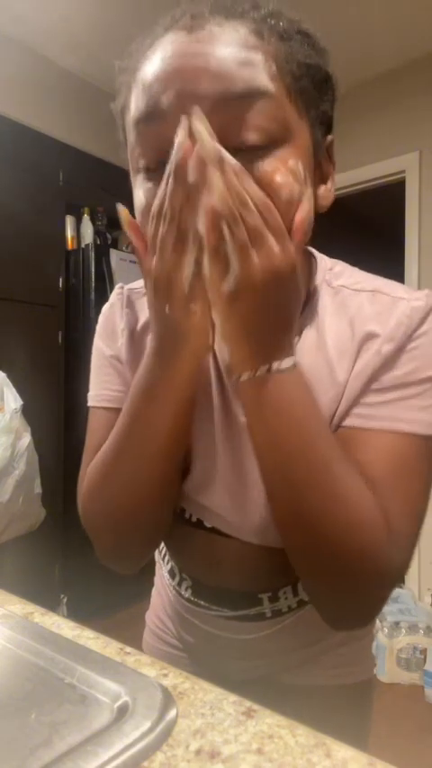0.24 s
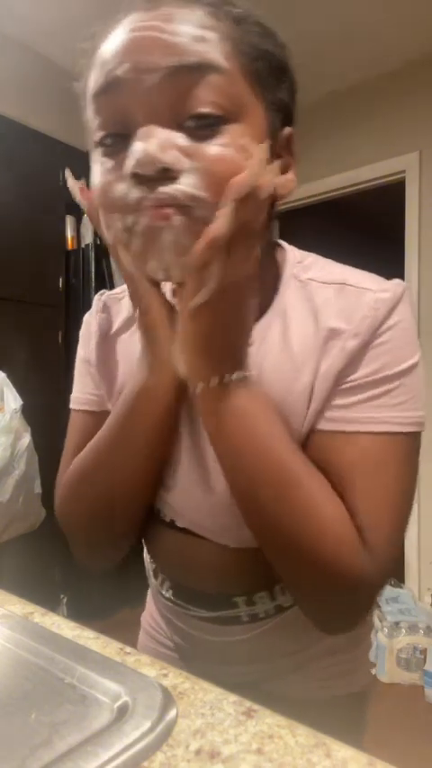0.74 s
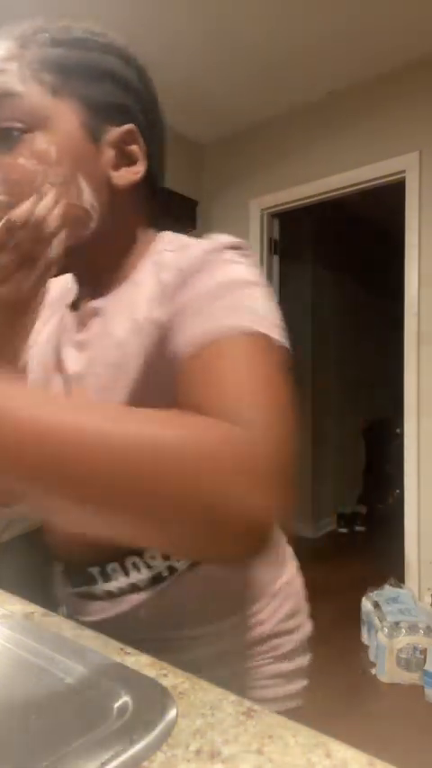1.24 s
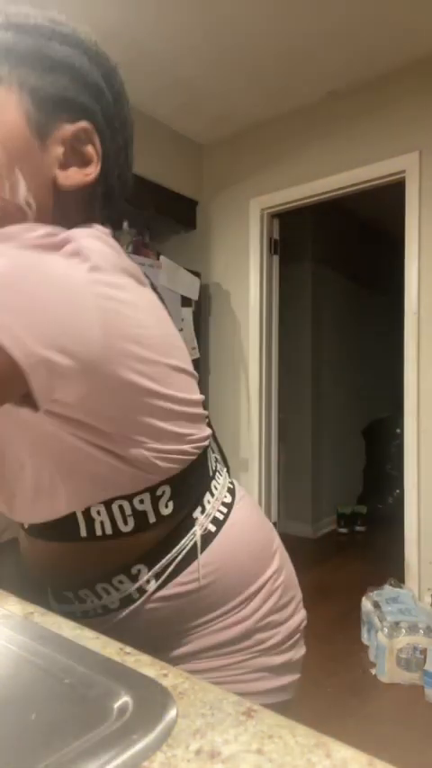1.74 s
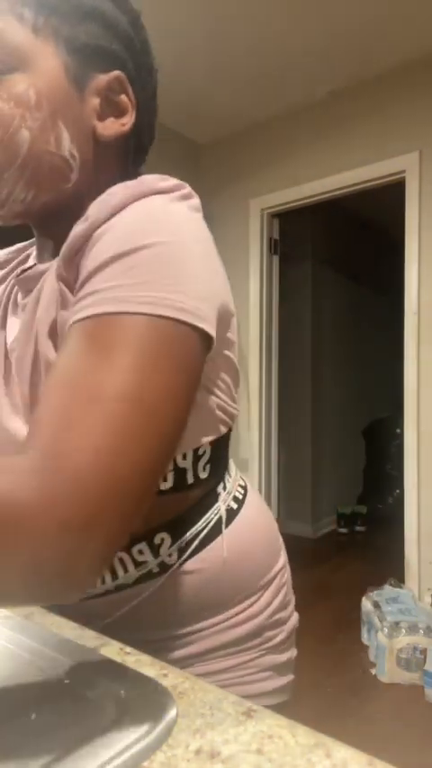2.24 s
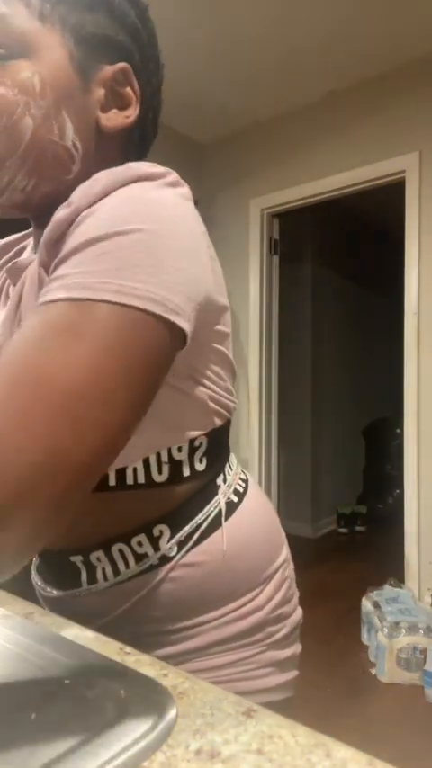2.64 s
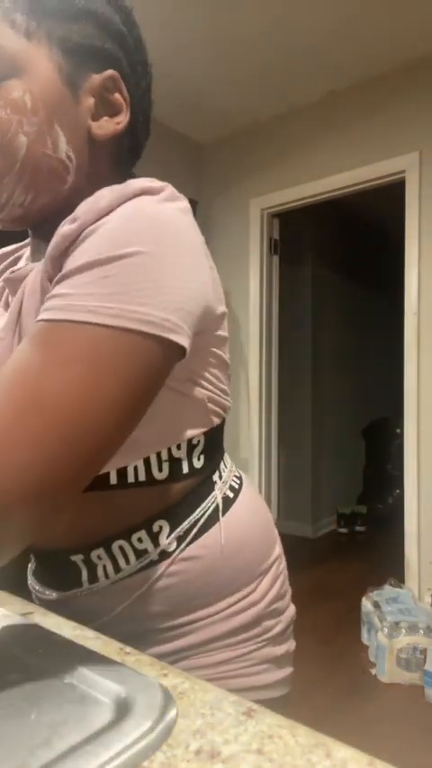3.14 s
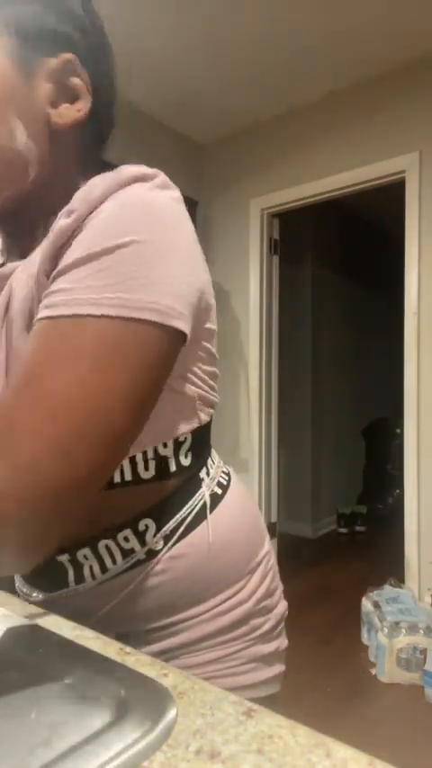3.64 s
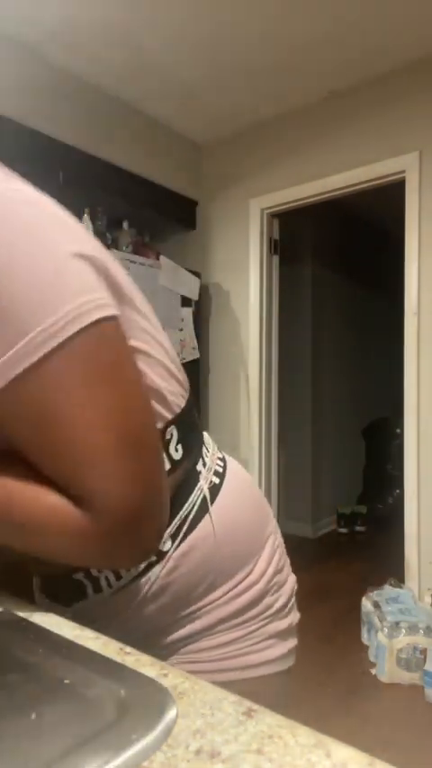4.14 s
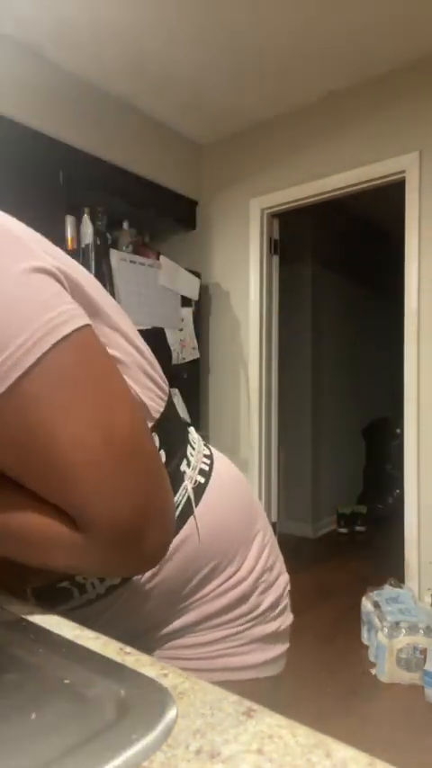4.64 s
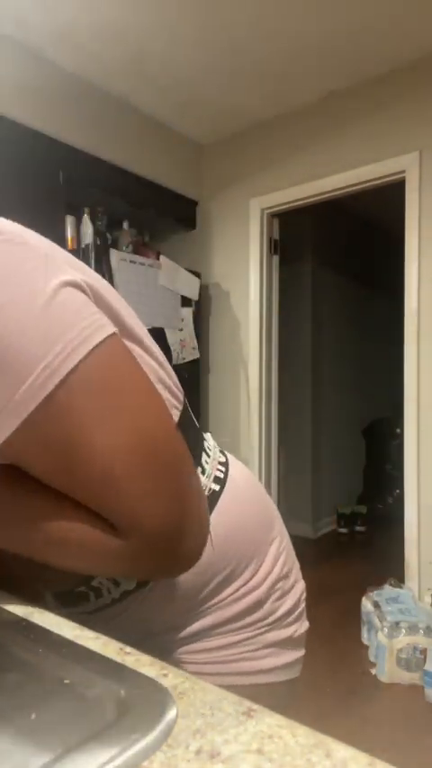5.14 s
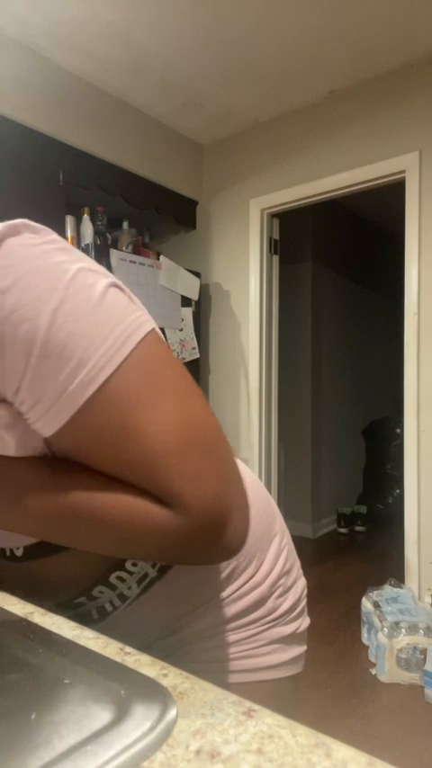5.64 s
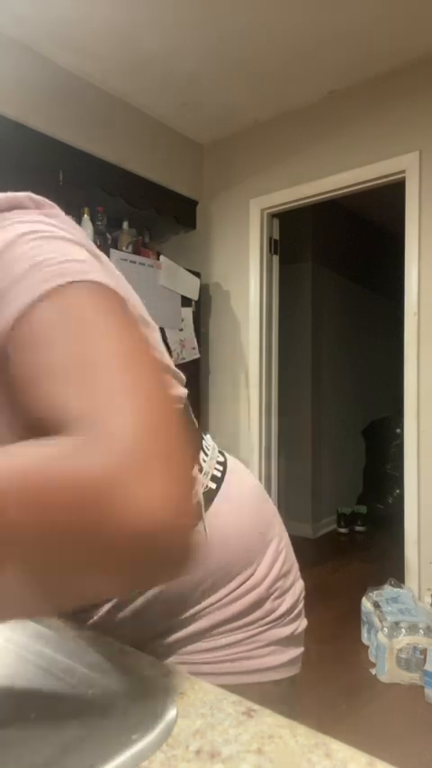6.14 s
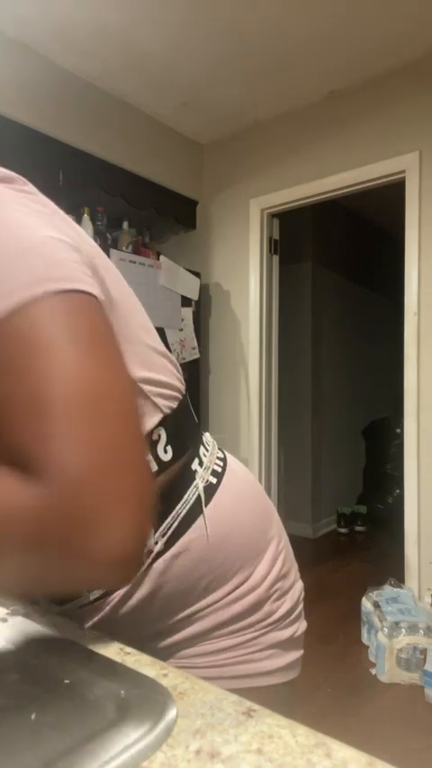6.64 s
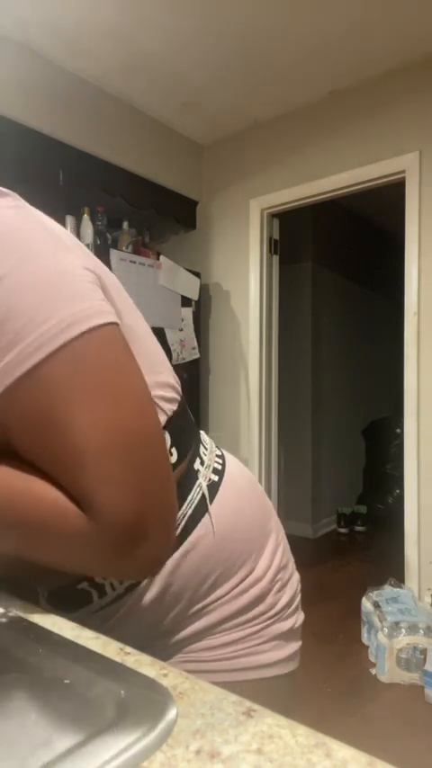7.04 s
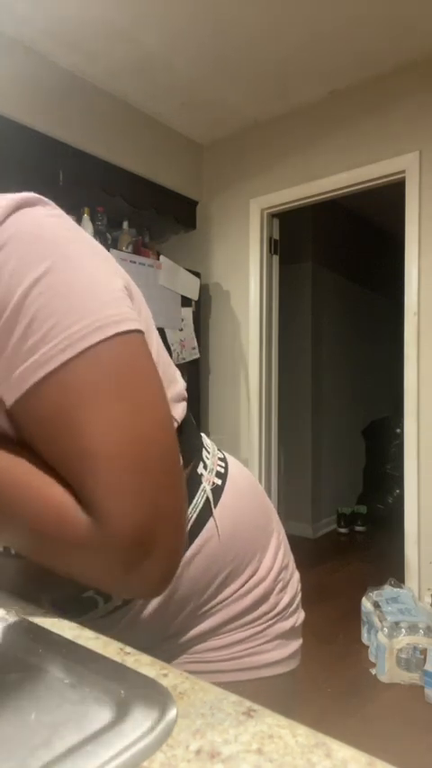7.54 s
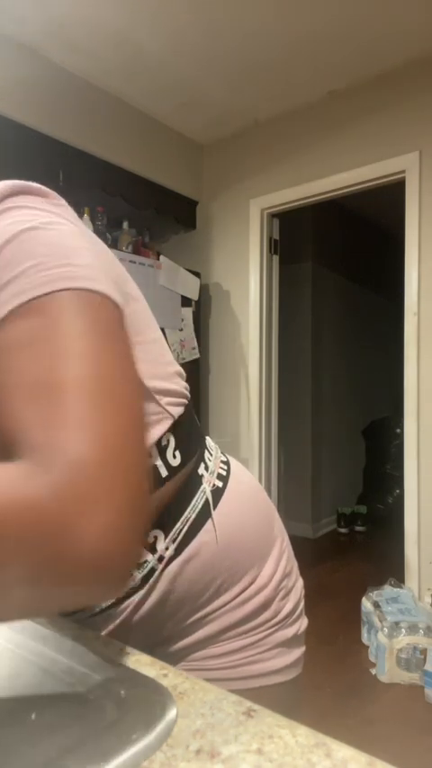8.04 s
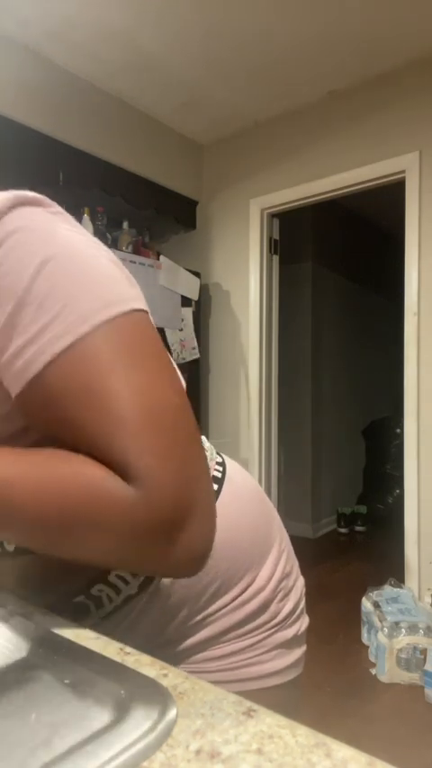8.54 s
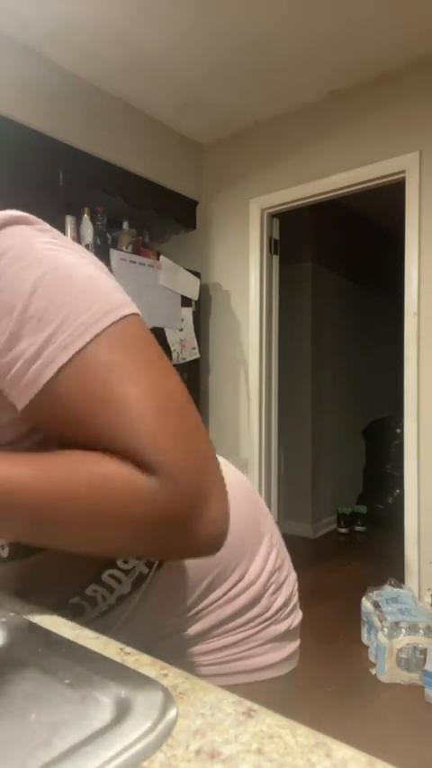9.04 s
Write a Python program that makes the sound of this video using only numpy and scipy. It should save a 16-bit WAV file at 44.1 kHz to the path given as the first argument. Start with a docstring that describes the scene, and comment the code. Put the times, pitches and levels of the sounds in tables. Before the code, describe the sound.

In a humming kitchen, counter bumps and tap knocks lead into water drumming steadily in a steel sink, with heavy splashes of dropped handfuls.

```python
"""A kitchen with a steel sink: the tap is opened and runs while someone rinses with cupped hands.
The stream is random drops that drum on the bowl's resonances, with fizzing shaped noise on top.
Dropped handfuls boom as clumps of drops, strike as short blows and spatter as bursts of noise.
Bubbles and drips are short tones, and walls echo the water as a tail of random taps.
Bumps are dying swings of the counter that the microphone stands on; steady fridge tones hum over dull noise."""
import sys
import numpy as np
from scipy import signal
from scipy.fft import rfft, irfft
from scipy.io import wavfile
from scipy.ndimage import uniform_filter1d

SR = 44100
rng = np.random.default_rng(int(sys.argv[2]) if len(sys.argv) > 2 else 0)


def gain_from_db(level_db):
    """Turn a decibel level (scalar or array-like) into a linear amplitude factor."""
    decades = np.asarray(level_db, float) / 20
    return 10 ** decades


def file_out(sig):
    """Save sig as 16-bit WAV at sys.argv[1]."""
    # one column per channel
    cols = np.atleast_2d(sig).T
    # limit, then scale
    lim = np.clip(cols, -1, 1)
    pcm = np.round(lim * 32767).astype(np.int16)
    wavfile.write(sys.argv[1], SR, pcm)


N = 409640  # length in samples

# Resonances of the bowl. Each row: pitch in Hz, width in Hz, relative level in dB under the stream,
# relative level in dB under a dropped handful.
BOWL_MODES = [(109.7, 6.7, -1.5, -4), (159, 50, -6.5, -10), (250.2, 21.4, -6.5, -11),
              (334.2, 23.4, -13, -6.5), (383.4, 18.4, -4, 0.5), (432.4, 27.5, -1.5, -6),
              (488.5, 21.8, 0, -2.5), (614, 122, -7.5, 3), (670.7, 66.7, -8.5, 8), (752, 27, -8, 3.5),
              (817.6, 97, -11, -7), (973, 33, -10.5, -12), (1108, 44, -10.5, -8), (1182.4, 46, -18, -6.5),
              (1268, 34, -16.5, -11.5), (1475, 94, -17.5, -21), (1515, 22.3, -11.5, -32.5),
              (1556, 26.3, -13, -22.5), (1668, 53, -20, -19.5), (1853, 53, -23, -30.5),
              (2134, 150, -32, -39.5), (2315, 120, -32.5, -23.5), (2648, 107, -27, -28.5),
              (2940, 36, -28.5, -22), (3170, 280, -39, -59), (3680, 120, -42, -30), (3870, 62, -42, -55),
              (4370, 200, -53.5, -58.5)]
# Fizz of the jet. Each row: frequency in Hz, relative level per Hz in dB.
FIZZ_SPECTRUM = [(2350, -33), (4000, -4.5), (4970, -5.5), (5970, -12.5), (7010, -13.5), (8320, -19.5),
                 (9220, -36), (12300, -17.5), (15200, -13.5), (15700, -9)]
# High rings of the steel that colour the fizz. Each row: pitch in Hz, width in Hz, lift in dB.
RIM_RINGS = [(4250, 150, 2.5), (4700, 200, 5.5), (5200, 150, 5.5), (6300, 300, 2), (7000, 300, 5.5),
             (8400, 300, 4), (13300, 500, -1.5), (14400, 400, 3), (15600, 250, 4)]
# A hand fumbling at the lever, then handfuls of water tumbling into the bowl. Each row: peak in seconds,
# seconds to gain 20 dB, seconds to lose 20 dB, relative boom level in dB, upper ring in dB against the boom.
TUMBLES = [(1.535, .02, .05, -25, -4), (1.63, .02, .09, -27, -9), (1.755, .02, .03, -26, -10),
           (1.955, .05, .04, -24, -10), (3.91, .1, .3, -30, -3), (4.09, .06, .1, -36, -4),
           (4.225, .02, .1, -39, 0), (4.43, .12, .2, -27, -3), (5.014, .06, .12, -32, -7),
           (5.325, .02, .1, -35, 0), (5.43, .07, .25, -23.5, -11), (6.6, .15, .1, -34, -8),
           (6.76, .06, .12, -27, -5), (7.09, .08, .06, -36, 3), (8.32, .08, .07, -31, -2),
           (8.44, .08, .6, -32.5, -2)]
# Lumps of water and knocks of the lever that strike the steel. Each row: time in seconds (the sound
# starts 2 ms before), peak level in dB, pitch of the blow in Hz.
STEEL_BLOWS = [(1.51, -30, 560), (1.527, -18, 470), (1.539, -20, 450), (1.619, -21, 560), (1.644, -28, 520),
               (1.748, -9, 520), (1.918, -14.5, 500), (1.934, -16, 520), (1.949, -15, 470),
               (3.929, -19.5, 516), (3.964, -21, 620), (4.008, -18.5, 624), (4.215, -17.5, 686),
               (4.234, -22, 660), (4.349, -17.5, 662), (4.377, -11, 656), (4.417, -16, 675),
               (4.438, -12.5, 640), (4.501, -20, 600), (4.995, -22, 565), (5.02, -21.5, 388),
               (5.082, -18.5, 365), (5.32, -19, 644), (5.415, -10, 402), (5.466, -15.5, 690),
               (5.483, -14, 665), (5.493, -7, 647), (5.523, -20, 380), (6.742, -21.5, 370),
               (6.776, -20, 398), (7.073, -22, 668), (7.128, -15, 654), (8.308, -26, 370),
               (8.408, -17.5, 634)]
# Spatter. Each row: start in seconds, then relative levels in dB of the slap, bright hiss and top spray.
SPATTER = [(1.5124, -64, -75, -80), (1.7587, -54, -64, -59), (1.953, -62, -58, -49), (2.041, -57, -65, -69),
           (2.1474, -67, -63, -69), (2.2064, -66, -68, -76), (2.2802, -60, -72, -78),
           (2.3314, -60, -71, -78), (2.394, -58, -77, -77), (2.4644, -70, -71, -87),
           (2.5845, -51, -65, -80), (2.6035, -49, -70, -83), (2.654, -63, -75, -74), (2.828, -53, -75, -73),
           (2.8694, -58, -67, -78), (2.9236, -56, -70, -76), (3.24, -60, -73, -77), (3.609, -71, -92, -69),
           (3.6737, -67, -67, -82), (3.8414, -73, -91, -70), (3.8638, -56, -67, -77),
           (3.9534, -54, -66, -67), (3.989, -67, -66, -87), (4.0193, -50, -66, -68),
           (4.2134, -58, -68, -77), (4.29, -48, -60, -77), (4.3477, -53, -66, -73), (4.3754, -62, -77, -74),
           (4.39, -62, -70, -68), (4.4194, -38, -53, -61), (4.4344, -48, -60, -63), (4.4982, -57, -61, -63),
           (4.7627, -59, -76, -78), (5.0793, -55, -73, -77), (5.3188, -57, -73, -81), (5.37, -63, -72, -79),
           (5.4031, -64, -68, -76), (5.4454, -54, -70, -65), (5.464, -42, -54, -62),
           (5.4916, -37, -51, -49), (5.522, -45, -53, -75), (6.4727, -66, -70, -77),
           (6.5946, -57, -62, -79), (6.7392, -52, -59, -55), (7.0728, -57, -76, -85),
           (7.1267, -58, -76, -78), (8.393, -60, -72, -81), (8.427, -49, -61, -77)]
# Single bubbles and drops that ring. Each row: start in seconds, level in dB, starting pitch in Hz,
# seconds to fade by 60 dB.
BUBBLES = [(.305, -53, 2640, .05), (.475, -54, 2700, .04), (2.466, -62, 7600, 0.053),
           (2.589, -41, 3600, .05), (2.602, -36.5, 3830, 0.065), (2.83, -46, 3550, .06),
           (2.925, -59, 6300, 0.071), (3.243, -49, 4000, 0.051), (3.325, -67, 7800, 0.038),
           (3.675, -62, 7600, .15), (4.42, -27.5, 3820, 0.037), (4.423, -40, 5200, .06),
           (4.44, -51, 4700, .14), (4.499, -55, 9800, 0.064), (5.458, -42, 3800, .05),
           (5.466, -40, 6300, .04), (5.472, -46, 5300, .04), (8.31, -52, 3820, 0.045),
           (8.428, -46, 5900, 0.05)]
# Fine drips off the fingers. Each row: time in seconds, average drips per second.
DRIP_RATE = [(1.9, 0), (2.0, 150), (3.0, 130), (3.4, 45), (5.3, 60), (5.7, 4), (9.29, 7)]
# Bumps through the counter. Each row: start in seconds, peak level in dB, pitch of the swing in Hz,
# seconds for the swing to fade by 60 dB.
COUNTER_BUMPS = [(0.979, -18.5, 84, 0.2), (1.104, -26, 54.9, 0.09), (1.505, -18.5, 64, 0.2),
                 (1.536, -17.5, 121, 0.2), (1.557, -10.5, 68.6, 0.23), (1.619, -16, 63.5, 0.41),
                 (1.645, -14.5, 114.7, 0.31), (1.98, -21, 104, 0.15), (2.05, -20, 105.5, 0.12),
                 (2.15, -21.5, 115.5, 0.23), (4.448, -19.5, 118, 0.25), (5.507, -17.5, 102.3, 0.34),
                 (5.544, -16, 114.6, 0.16), (8.457, -23, 115, 0.2)]
# Noise of the room. Each row: frequency in Hz, relative level per Hz in dB.
ROOM_SPECTRUM = [(18, -41), (30, -15), (43, -11.5), (65, -5.5), (87, -7), (118, -11.5), (135, -30.5),
                 (167, -11), (206, -25), (275, -20), (340, -21.5), (437, -18.5), (520, -19.5), (1240, -34),
                 (3000, -51), (3900, -94), (6600, -120)]
# Standing waves that colour the room noise. Each row: pitch in Hz, width in Hz, lift in dB.
STANDING_WAVES = [(81, 10, -3.5), (119.5, 24, 4.5), (168.1, 9, 8), (296.6, 30, 7.5), (385, 29, 8.5),
                  (465, 12, 11.5), (599, 34, 9), (1220, 25, 7), (1370, 50, 8)]
# Fridge tones, three close ones beating. Each row: pitch in Hz, rms level in dB, lead in turns.
FRIDGE_TONES = [(59.24, -40.5, 0), (57.93, -44, 0), (58.58, -52, .25), (118.5, -52, 0), (177.74, -55, 0)]
# Thin top of the background. Each row: frequency in Hz, relative level per Hz in dB.
HISS_SPECTRUM = [(1470, -33), (2500, -2), (3030, -5), (3390, -4.5), (4970, -14), (5280, -14.5), (9290, -25),
                 (11200, -22), (15500, -30)]

OPEN_S = 1.74  # the water reaches the steel
DEEP_HZ = 400  # blows below this pitch count as deep


def evened(x):
    """Scales to rms 1."""
    return x / np.sqrt(np.mean(x ** 2) + 1e-20)


def add(mix, s, sound):
    """Mixes a sound in at time s."""
    part = mix[round(s * SR):][:len(sound)]
    part += sound[:len(part)]


def fading(t, t60):
    """A level that falls by 60 dB in t60 seconds."""
    return gain_from_db(-60 * t / t60)


def coloured(x, points, lifts=()):
    """Filters x by a (Hz, dB) table, raised or lowered around each resonance."""
    hz = np.fft.rfftfreq(len(x), 1 / SR)
    f, db = np.transpose(points)
    shape_db = np.interp(np.log(hz + 1), np.log(f + 1), db)
    for centre_hz, width, lift_db in lifts:
        shape_db = shape_db + lift_db / (1 + (2 * (hz - centre_hz) / width) ** 2)
    return irfft(rfft(x) * gain_from_db(shape_db), len(x))


def ring(column, low=0, high=99999):
    """Answer of the bowl to one sharp tap: dying tones of its modes between low and high Hz."""
    t = np.arange(8192) / SR
    answer = np.zeros(len(t))
    for k, mode in enumerate(BOWL_MODES):
        hz, width = mode[:2]
        if low <= hz < high:
            strength = (-1) ** k * gain_from_db(mode[column]) * width  # neighbours swing opposite
            answer += strength * np.exp(-np.pi * width * t) * np.sin(2 * np.pi * hz * t)
    return answer


def droplets(per_s, spread_db):
    """A random train of impacts; a few are large."""
    size = gain_from_db(spread_db * np.minimum(rng.exponential(1, N), 5)) * rng.standard_normal(N)
    return evened(size * (rng.random(N) < per_s / SR))


def flicker(seconds):
    """Smooth chance of rms 1 that changes over the given time."""
    width = max(round(seconds * SR), 2)
    smoothed = uniform_filter1d(rng.standard_normal(N), width)
    return evened(uniform_filter1d(smoothed, width))


def stream():
    """The broken jet drums the bowl and fizzes; both follow the flow."""
    surge_db, settle_s = 2, .08  # the first rush is stronger and settles to a steady flow
    drum_db, fizz_db = -33, -72.5  # rms
    since = np.maximum(np.arange(N) / SR - OPEN_S, 0)
    flow = np.minimum(since / 0.039, 1) * gain_from_db(surge_db * np.exp(-since / settle_s))
    drive = droplets(6000, 1.7) * gain_from_db(0.5 * flicker(0.054))
    drum = signal.oaconvolve(drive * flow, ring(2))[:N]
    spray = droplets(6000, 2.4) * gain_from_db(1.3 * flicker(.012))
    fizz = coloured(spray * flow, FIZZ_SPECTRUM, RIM_RINGS)
    return gain_from_db(drum_db) * evened(drum) + gain_from_db(fizz_db) * evened(fizz)


def tumble():
    """Loose water lands off-centre in clumps and wakes the deep boom and the upper ring."""
    t = np.arange(N) / SR
    boom, upper = np.zeros((2, N))
    for s, rise_s, fall_s, boom_db, upper_db in TUMBLES:
        swell = gain_from_db(boom_db - 20 * np.maximum((s - t) / rise_s, (t - s) / fall_s))
        boom += swell
        upper += gain_from_db(upper_db) * swell
    bright = gain_from_db(np.where(t > OPEN_S, -19, -34)) * upper  # dry hands on the lever stay duller
    soft = np.hanning(12)  # water lands softly
    lumps = signal.oaconvolve(droplets(2500, 1.2), soft / soft.sum(), "same")
    out = np.zeros(N)
    for level, answer in (boom, ring(3, 200, 520)), (upper, ring(3, 520, 1400)), (bright, ring(3, 1400)):
        out += signal.oaconvolve(lumps * level, answer / np.linalg.norm(answer))[:N]
    return out


def blows():
    """Each blow is a soft push of a few cycles; its length picks the modes that answer."""
    hardness = .05  # share of hard front edge
    lever_until_s = 2.  # earlier blows are treated as knocks of the lever
    thud_lever, thud_deep, thud_high = .22, .4, .13  # share of dull thud
    wet_t60_s = .22  # the landed water damps the ring further
    out = np.zeros(N)
    answer = ring(3, 200) * fading(np.arange(8192) / SR, wet_t60_s)
    band = signal.butter(4, [350, 1300], "band", fs=SR)
    dull = evened(signal.lfilter(*band, rng.standard_normal((len(STEEL_BLOWS), 4000))))
    after = np.arange(4000) / SR
    for (s, db, hz), noise in zip(STEEL_BLOWS, dull):
        t = np.arange(round(6 * SR / hz)) / SR
        swell = np.e * (t * hz / 0.75) * np.exp(-t * hz / 0.52)
        push = swell * np.sin(2 * np.pi * hz * t)
        crack = hardness * (t < 1 / SR)  # the hard front edge reaches the high modes
        sound = signal.fftconvolve(push / np.abs(push).sum() + crack, answer)
        sound /= np.abs(sound).max()
        add(sound, 0, 0.9 * push)  # the blow itself is heard, broader than the ring
        thud = noise * np.minimum(after / 0.0023, 1) * fading(after, 0.07)
        if s < lever_until_s:
            share = thud_lever
        else:
            share = thud_deep if hz < DEEP_HZ else thud_high
        add(sound, 0, share * thud)
        add(out, s - .002, gain_from_db(db) * sound / np.abs(sound).max())
    return out


def splats():
    """A drop bursts: a smack, a slap, a brighter hiss and a fine spray on top, all dying fast."""
    alone_db, high_db, deep_db = 2, 10, 14  # smack against slap: alone, with a high or a deep blow
    longest_t60_s, halving_db = .13, 15  # tail of a -60 dB burst; it halves with each such step louder
    out, t = np.zeros(N), np.arange(6000) / SR
    hz = np.fft.rfftfreq(len(t), 1 / SR)
    bands = []
    for centre_hz, width in (2200, 870), (3700, 1400), (7000, 2440), (14400, 2100):
        band = np.exp(-((hz - centre_hz) / width) ** 2)
        bands.append(evened(band))
    smack, slap, hiss, top = bands
    noises = rng.standard_normal((len(SPATTER), len(t)))
    for (s, slap_db, hiss_db, top_db), noise in zip(SPATTER, noises):
        with_hz = [blow_hz for blow_s, _, blow_hz in STEEL_BLOWS if abs(s - blow_s) < .008]
        if not with_hz:
            extra_db = alone_db
        else:
            extra_db = deep_db if with_hz[0] < DEEP_HZ else high_db
        loudest_db = max(slap_db, hiss_db, top_db, -60)
        t60 = longest_t60_s * .5 ** ((loudest_db + 60) / halving_db)
        burst = noise * (fading(t, t60) + np.exp(-t / 0.0005)) * np.minimum(t / 0.0015, 1)
        colour = gain_from_db(slap_db + extra_db) * smack + gain_from_db(slap_db) * slap
        colour += gain_from_db(hiss_db) * hiss + gain_from_db(top_db) * top
        fade_out = np.cos(np.pi / 2 * t / t[-1])
        add(out, s, irfft(rfft(burst) * colour) * fade_out)
    return out


def bubble(hz, t60, wobble):
    """A ringing bubble whose pitch climbs a little and wobbles as it nears the surface."""
    t = np.arange(len(wobble)) / SR
    pitch = hz * (1 + 0.49 * t + 0.058 * evened(uniform_filter1d(wobble, 60)))
    turns = np.cumsum(pitch) / SR
    return np.sin(2 * np.pi * turns) * fading(t, max(t60, .01)) * np.minimum(t / 0.003, 1)


def pings():
    """The drops that stand out, each a ringing bubble."""
    out = np.zeros(N)
    for (s, db, hz, t60), wobble in zip(BUBBLES, rng.standard_normal((len(BUBBLES), 6000))):
        add(out, s, gain_from_db(db) * bubble(hz, t60, wobble))
    return out


def trickle():
    """Many faint drips at random moments, each of one of 16 pitches; the higher, the weaker."""
    s, per_s = np.transpose(DRIP_RATE)
    chance = np.interp(np.arange(N) / SR, s, per_s) / SR
    size = gain_from_db(2.7 * np.minimum(rng.exponential(1, N), 3)) * (rng.random(N) < chance)
    kind, out = rng.integers(0, 16, N), np.zeros(N)
    for k, hz in enumerate(np.geomspace(3300, 9000, 16)):
        drip = bubble(hz, 0.054, rng.standard_normal(2000)) * (4000 / hz) ** 2.2
        out += signal.oaconvolve(size * (kind == k), drip)[:N]
    return gain_from_db(-63.5) * out


def kitchen(x):
    """Short tail of the walls: sparse taps of random sign."""
    t = np.arange(SR // 2) / SR
    taps = rng.choice([-1., 1.], len(t)) * (rng.random(len(t)) < 2000 / SR)
    tail = taps * (t > .004) * fading(t, 0.39)
    return signal.oaconvolve(x, tail / np.linalg.norm(tail))[:N]


def bumps():
    """The counter swings a few times after each bump, with a higher panel mode and a dull thud."""
    out, t = np.zeros(N), np.arange(SR // 2) / SR
    dull = signal.butter(2, 500, fs=SR)
    noises = rng.standard_normal((len(COUNTER_BUMPS), len(t)))
    for (s, db, hz, t60), noise in zip(COUNTER_BUMPS, noises):
        swing = np.sin(2 * np.pi * hz * t) * fading(t, max(t60, .03))
        panel = 0.55 * np.sin(2 * np.pi * 170 * t) * fading(t, 0.099)
        thud = 0.067 * evened(signal.lfilter(*dull, noise)) * fading(t, 0.15)
        sound = (swing + panel + thud) * (1 - np.exp(-t * hz / 0.22))  # soft start
        add(out, s, gain_from_db(db) * sound / np.abs(sound).max())
    return out


def fridge():
    """Steady tones; the close ones drift in and out of step, so the hum beats."""
    in_step_s = 3.54  # a moment when the two strongest close tones swell together
    t = np.arange(N) / SR - in_step_s
    hum = np.zeros(N)
    for hz, db, lead in FRIDGE_TONES:
        hum += np.sqrt(2) * gain_from_db(db) * np.cos(2 * np.pi * (hz * t + lead))
    return hum


def room():
    """Dull air noise shaped by standing waves; its level flickers slightly."""
    noise = rng.standard_normal(N) * gain_from_db(0.44 * flicker(0.15))
    air = coloured(noise, ROOM_SPECTRUM, STANDING_WAVES)
    return gain_from_db(-37.5) * evened(air)


def scene():
    """Everything that the one microphone hears."""
    hits = blows() + splats() + pings() + trickle() + tumble()
    water = stream()
    echo = kitchen(gain_from_db(-13) * hits + gain_from_db(-9) * water)
    return (hits + water + echo + bumps() + room() + fridge())[None]


def band_limit(x):
    """A steep low-pass at the top of the band."""
    return signal.sosfilt(signal.butter(12, 16450, fs=SR, output="sos"), x)


def record(dry):
    """Adds the hiss of the electronics, then thins the deep bass and cuts the extreme treble."""
    hiss = evened(coloured(rng.standard_normal(N), HISS_SPECTRUM))
    hissing = dry + gain_from_db(-70) * hiss
    thin = signal.sosfilt(signal.butter(2, 30, "high", fs=SR, output="sos"), hissing)
    low_pass = signal.firwin(1023, 15830, window=("kaiser", 9), fs=SR)
    finished = signal.oaconvolve(thin, low_pass[None], "same")
    return band_limit(finished)


dry = scene()
out = record(dry)
file_out(out)
```